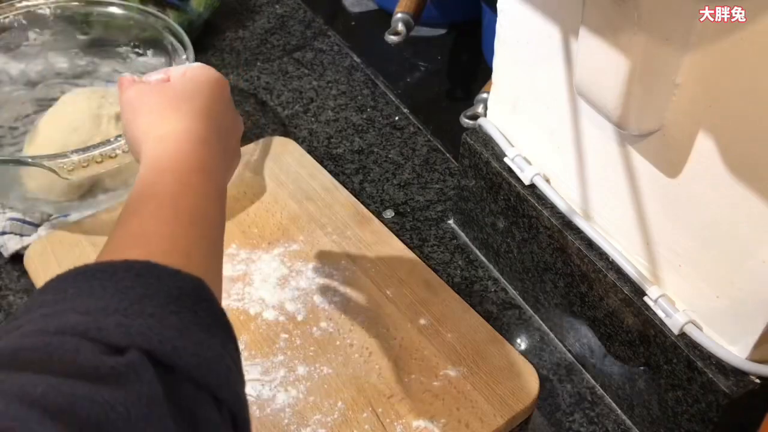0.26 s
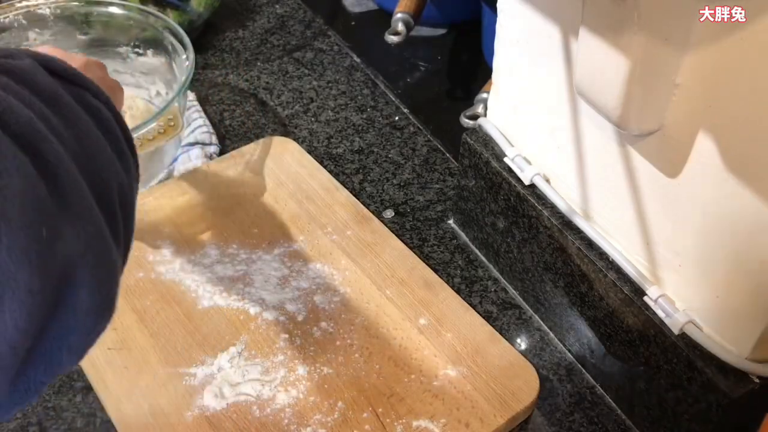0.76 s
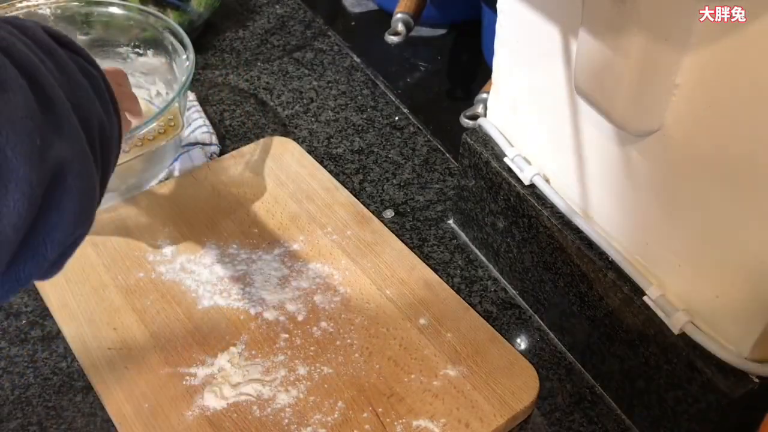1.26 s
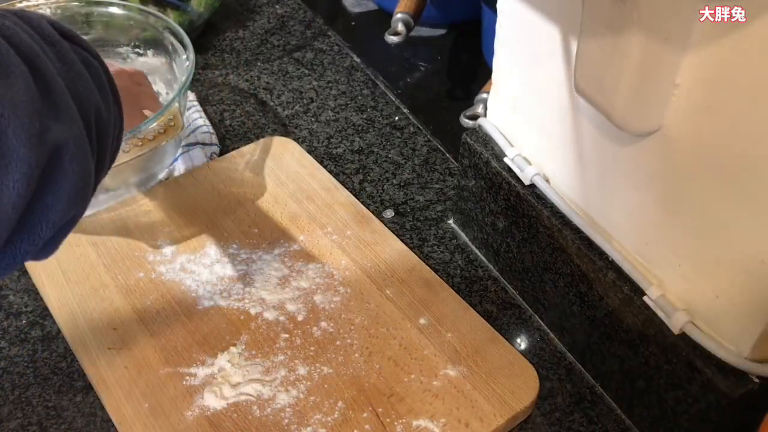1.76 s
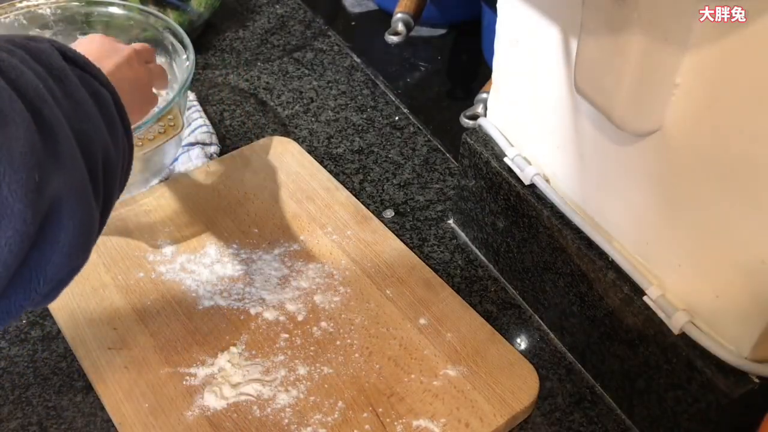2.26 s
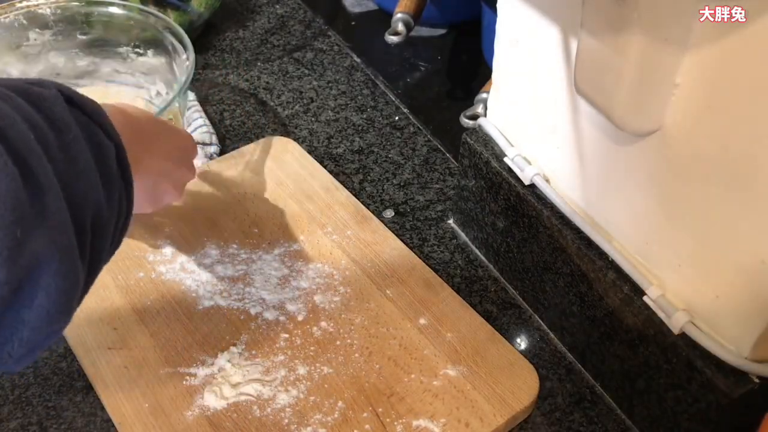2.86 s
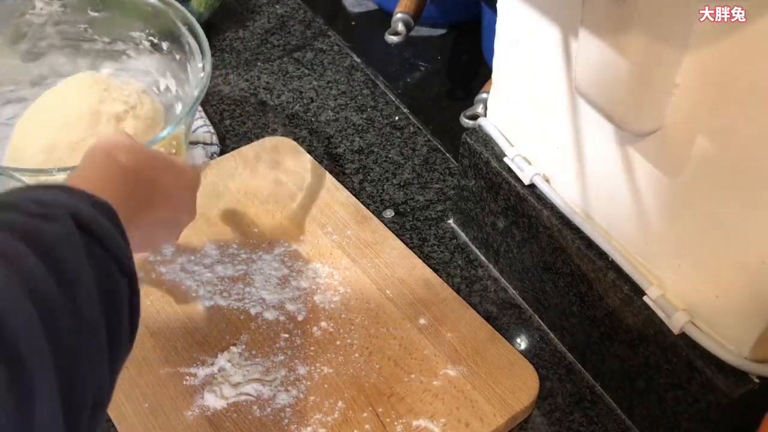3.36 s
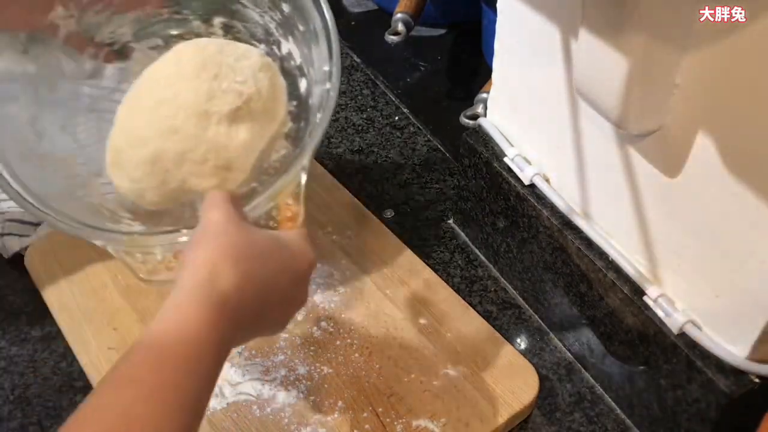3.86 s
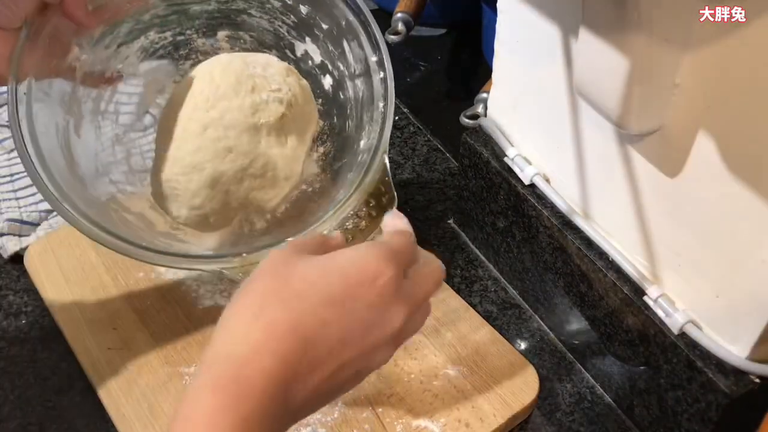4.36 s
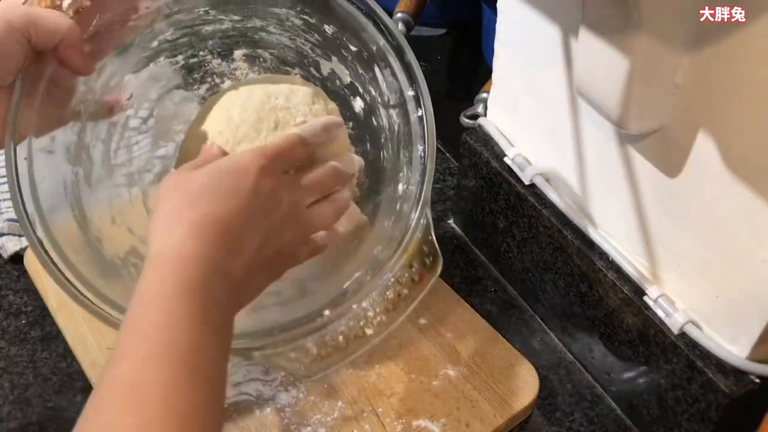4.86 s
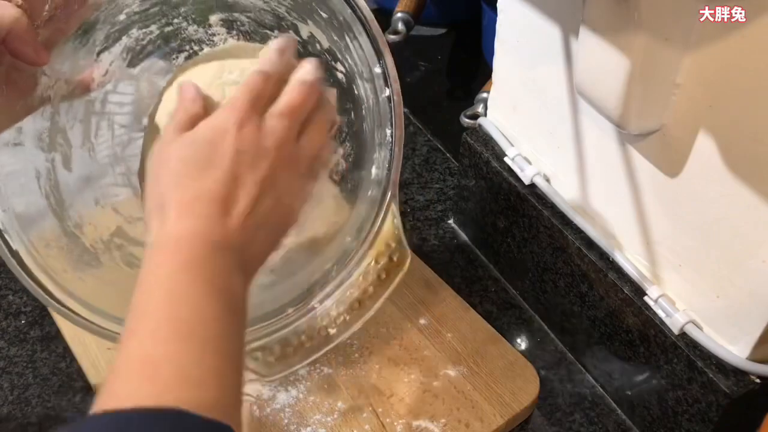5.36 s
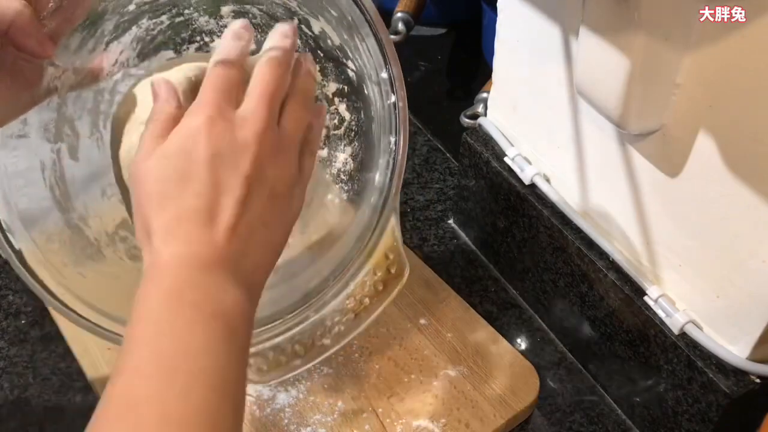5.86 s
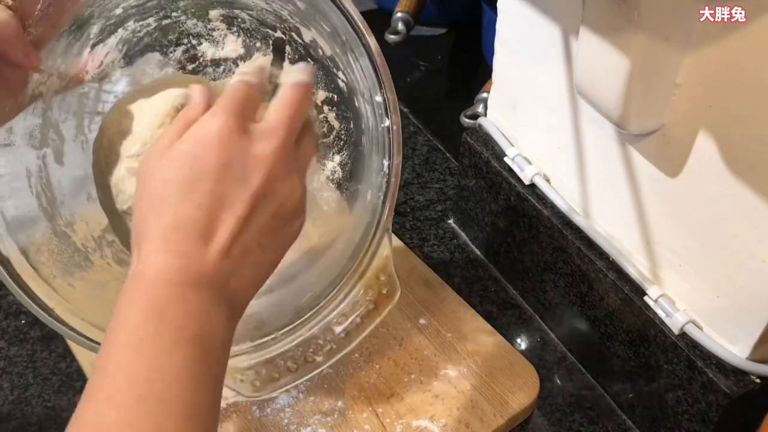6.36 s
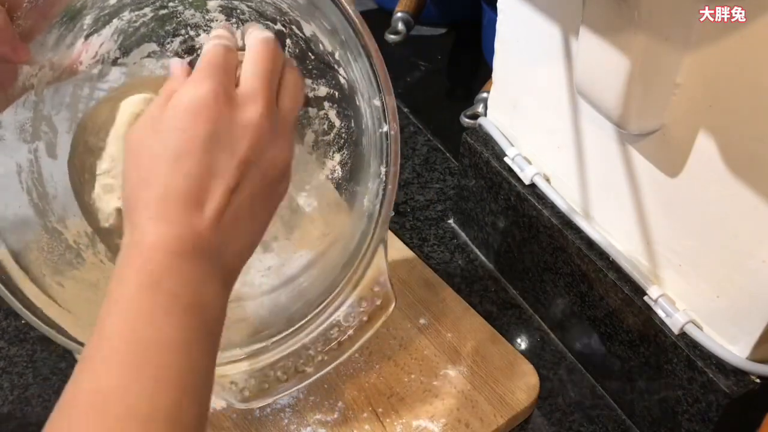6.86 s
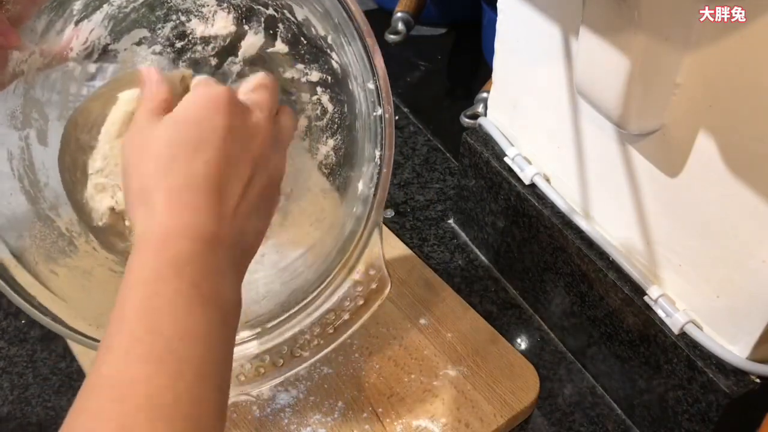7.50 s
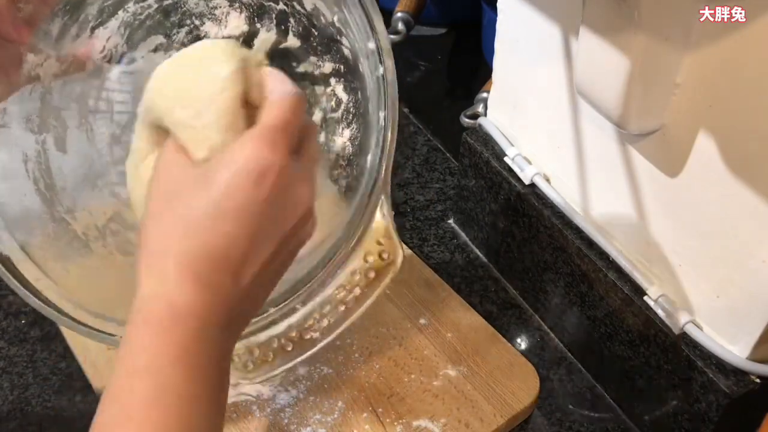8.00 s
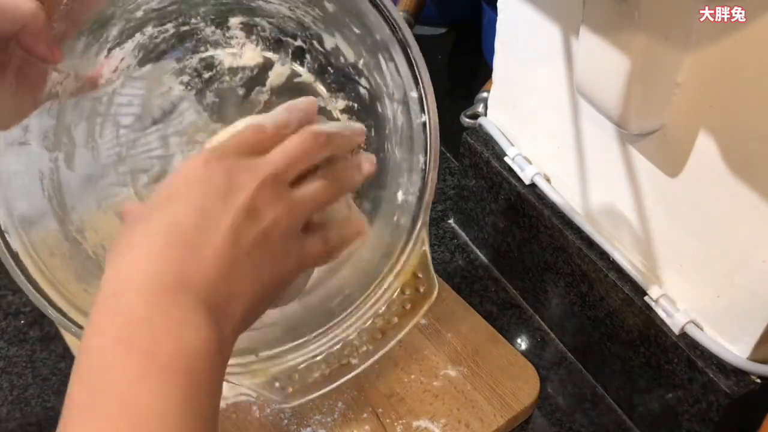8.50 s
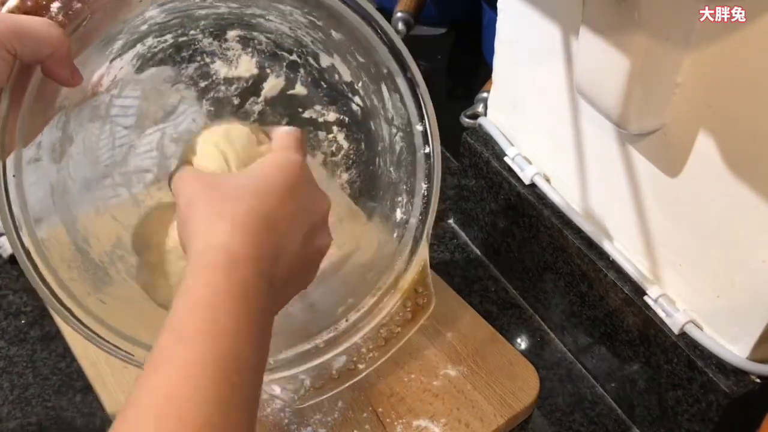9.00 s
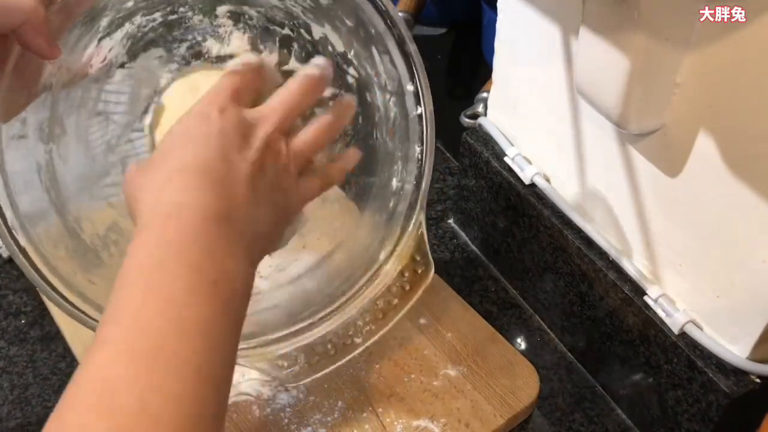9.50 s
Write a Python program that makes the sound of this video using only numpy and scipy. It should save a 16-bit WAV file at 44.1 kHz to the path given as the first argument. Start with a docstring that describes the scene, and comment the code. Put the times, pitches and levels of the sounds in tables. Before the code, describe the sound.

In a quiet kitchen, a sleeve brushes close to the microphone with a soft, thin hiss. A glass bowl lands on a stone counter with a loud ringing clank, followed by a duller knock. It scuffs over a wooden board while the sleeve rustles and ticks. Then a hand kneads dough in the bowl, with gentle rubbing, sticky crackles, small hollow plops and a few faint squeaks.

```python
"""A quiet kitchen: a glass bowl of dough clanks down twice on a stone counter and rings.
The bowl scuffs over a wooden board and a hand kneads in it: skin rubs, dough smears and squeaks
on the glass, air pockets plop. A sleeve brushes close to the microphone, hissing and ticking
in the resonances of its port."""
import sys
import numpy as np
from scipy import signal
from scipy.fft import rfft, irfft, next_fast_len
from scipy.io import wavfile
from scipy.ndimage import map_coordinates

SR = 44100
rng = np.random.default_rng(int(sys.argv[2]) if len(sys.argv) > 2 else 0)


def materialize(psi):
    """Save the field psi as 16-bit PCM at rate SR to the path in sys.argv[1].

    A 1-D psi becomes a single channel; in a 2-D psi each row is a channel.
    """
    bounded = np.clip(np.atleast_2d(psi).T, -1, 1)
    quanta = np.round(bounded * 32767).astype(np.int16)
    wavfile.write(sys.argv[1], SR, quanta)


N = 429534
TOP_HZ = 15900
HAND_IN_S = 5.2  # hand stays on the dough from here
# air cavity of the bowl: (frequency [Hz], density [dB])
BOWL_CAVITY = [(200, -11), (330, -7.5), (470, -9), (600, 4), (760, -13.5), (1200, -17), (3000, -40)]


def amp(db):
    return 10 ** (np.asarray(db) / 20)


def unit_rms(x):
    return x / np.sqrt(np.mean(x ** 2) + 1e-20)


def log_interp(points, hz):
    """Interpolate (frequency [Hz], value) points on a log axis."""
    point_hz, values = np.transpose(points)
    return np.interp(np.log(hz + 1), np.log(point_hz + 1), values)


def wobble(rate_hz):
    """Smooth random curve, rate_hz knots a second."""
    knots = rng.standard_normal(int(N * rate_hz / SR) + 4)
    return map_coordinates(knots, [np.arange(N) * rate_hz / SR])


def filtered(x, response):
    """FFT filter with gain response(hz)."""
    size = next_fast_len(len(x) + SR // 4)
    return irfft(rfft(x, size) * response(np.fft.rfftfreq(size, 1 / SR)), size)[:len(x)]


def coloured(x, spectrum):
    """Shape x by (frequency [Hz], density [dB]) points, rolled off past the ends; rms 1."""
    closed = [(spectrum[0][0] / 2, -80), *spectrum, (spectrum[-1][0] * 2, -80)]
    return unit_rms(filtered(x, lambda hz: amp(log_interp(closed, hz))))


def noise(spectrum, size=N):
    return coloured(rng.standard_normal(size), spectrum)


def add(track, start_s, sound):
    part = track[round(start_s * SR):][:len(sound)]
    part += sound[:len(part)]


def friction(rate_hz, scatter_db, share):
    """Countless fine slips plus sparse catches that carry `share` of the power."""
    catches = (rng.random(N) < rate_hz / SR) * rng.standard_normal(N)
    catches *= amp(scatter_db * np.clip(rng.standard_normal(N), -2, 2))
    return np.sqrt(share) * unit_rms(catches) + np.sqrt(1 - share) * rng.standard_normal(N)


def swells(moves, shape, lean, stray_db=-18, stray_spread=3.3):
    """Friction envelope following each movement's speed; lean > 0 fades faster than it grows."""
    t, power = np.arange(0, N, 32) / SR, 0
    for mid_s, length_s, db in moves:
        away = np.abs(2 * (t - mid_s) / length_s) * np.exp(lean * np.sign(t - mid_s))
        light_contact = amp(stray_db) ** 2 * np.exp(-(away / stray_spread) ** 2)
        power += amp(db) ** 2 * (np.exp(-away ** shape) + light_contact)
    return np.interp(np.arange(N) / SR, t, np.sqrt(power))


def ring(modes, t, scatter_db, waver=0):
    """Damped modes struck with random strength and phase; reflections make them waver."""
    knots_s, out = np.arange(0, 1, 1 / 60), 0
    drift = lambda: waver * np.interp(t, knots_s, rng.standard_normal(len(knots_s)))
    for hz, db, t60_s in modes:
        envelope = amp(db + rng.normal(0, scatter_db) + 5.9 * drift() - 60 * t / t60_s)
        out += envelope * np.sin(2 * np.pi * (hz * t + rng.random()) + drift())
    return out


def kitchen_decay(x):
    """Fade each frequency at the kitchen's reverberation rate."""
    # reverberation: (frequency [Hz], t60 [s])
    reverb = [(170, 0.36), (1000, 0.4), (3000, 0.33), (10000, 0.27)]
    hz, t, spectra = signal.stft(x, SR, nperseg=256)
    decay = amp(-60 * t / log_interp(reverb, hz)[:, None])
    return signal.istft(spectra * decay, SR, nperseg=256)[1][:len(x)]


def room(air_db=-55.5, whine_hz=10815, whine_db=-74):
    """Steady kitchen air with a thin electrical whine."""
    # room tone: (frequency [Hz], density [dB])
    air = [(20, 6.5), (40, -1.5), (80, -4.5), (160, -7.5), (320, -9.5), (640, -12.5), (1250, -15.5),
           (2500, -18), (4000, -19), (4900, -22.5), (6500, -19), (9000, -21), (12500, -21.5), (15800, -23)]
    whine = np.sin(2 * np.pi * np.cumsum(whine_hz + 8 * wobble(40)) / SR)
    return amp(air_db) * noise(air) + amp(whine_db) * whine


def sleeve(rest_db=-63.5, body_front_db=-14, body_beside_db=-19, turn_mid_s=3.83, turn_length_s=0.68):
    """Fibres slip over each other; the port's upper resonance sinks as the arm draws back."""
    # arm reaches out, draws the bowl in: (centre [s], length [s], level [dB])
    brushes = [(0.13, .08, -51.5), (0.25, 0.27, -59), (0.445, 0.12, -48.5), (0.545, 0.095, -44.5),
               (0.785, 0.077, -43.5), (0.965, .11, -47.5), (1.14, 0.15, -51.5), (1.315, 0.073, -52),
               (1.525, .04, -54), (2.89, .06, -37.5), (3.02, 0.056, -53), (3.17, 0.13, -53.5),
               (3.52, 0.2, -44), (3.68, 0.064, -45), (3.92, 0.25, -41), (4.125, 0.07, -42.5),
               (4.52, 0.052, -47), (4.65, 0.19, -38.5), (4.925, 0.045, -39), (5.04, 0.066, -49.5),
               (5.17, .14, -59.5)]
    # hiss in front of the port, hiss beside it, cloth body: (frequency [Hz], density [dB])
    hiss_front = [(3000, -15), (3900, -11.5), (4400, -4.5), (4800, 3.5), (5250, -2.5), (6300, -9.5),
                  (7400, -5.5), (8400, -3.5), (9400, 0), (11500, -5.5), (15500, -9.5)]
    hiss_beside = [(3000, -25), (3900, -15.5), (4400, -7.5), (4900, 4.5), (5250, 0), (6300, -9.5),
                   (7400, -2), (8400, 1), (9400, -5.5), (11500, -6.5), (15500, -10.5)]
    cloth_body = [(100, 4), (300, 1.5), (700, 1.5), (1500, 0.5), (2800, -2.5), (4500, -31)]
    t = np.arange(N) / SR
    resting = amp(rest_db + 2 * wobble(10)) * (t < HAND_IN_S)
    envelope = np.hypot(resting, swells(brushes, shape=1.78, lean=0.08))
    slips = friction(rate_hz=2200, scatter_db=3, share=0.3) * amp(1.37 * wobble(70))
    back = np.clip((t - turn_mid_s) / turn_length_s + 0.5, 0, 1)
    hiss = (1 - back) * coloured(slips, hiss_front) + back * coloured(slips, hiss_beside)
    body = amp((1 - back) * body_front_db + back * body_beside_db) * coloured(slips, cloth_body)
    return envelope * (hiss + body)


def ticks(low_hz=5100, high_hz=8500, low_db=9, high_db=-6, snap_db=-11, t60_s=0.0056, delay_s=0.0012):
    """Tiny snaps of cloth and sticky dough ring the microphone port."""
    # snaps: (time [s], level [dB], low resonance offset [dB])
    snaps = [(0.5245, -21, -24), (0.9716, -30, -19), (1.3457, -24, -25), (1.5365, -25.5, -21),
             (4.0301, -18.5, -26), (4.049, -24.5, -7.5), (4.8373, -30, -9), (4.9394, -9.5, -12),
             (5.0644, -34, -20), (5.6056, -40, -9), (5.6968, -35, -8), (7.2015, -40, -13),
             (7.3248, -40, -17), (7.878, -35, -27), (8.6915, -32, -15), (8.7044, -39, -14),
             (9.4464, -38, -14), (9.6114, -41, -21)]
    out, t = np.zeros(N), np.arange(SR // 40) / SR
    for time_s, db, offset_db in snaps:
        port = amp(low_db + offset_db) * np.sin(2 * np.pi * low_hz * t)
        port += amp(high_db) * np.sin(2 * np.pi * high_hz * t)
        snap = amp(snap_db) * noise([(4000, -9), (5000, 3), (8500, -3), (15000, 3)], size=len(t))
        add(out, time_s + delay_s, amp(db - 60 * t / t60_s) * (port + snap))
    # sources this small carry no bass
    return signal.lfilter(*signal.butter(N=7, Wn=4300, btype="high", fs=SR), out)


def drag(gain_db=-1):
    """The heavy bowl shifts on towel and board with an uneven low scuffing."""
    # shifts: (centre [s], length [s], level [dB])
    shifts = [(0.52, 0.27, -60), (0.79, .1, -59), (2.84, 0.078, -55), (3.49, .12, -60), (3.87, 0.37, -56),
              (4.62, 0.22, -59), (4.92, 0.096, -54.5), (5.06, 0.13, -62.5), (6.95, 0.14, -57.5),
              (7.09, .08, -60), (9.48, 0.32, -62)]
    unevenness = amp(gain_db + 3 * wobble(26))
    scuffing = noise([(70, -5), (190, -1), (330, -1.5), (520, -7), (1200, -11), (2400, -14)])
    return swells(shifts, shape=1.8, lean=0.05) * unevenness * scuffing


def squeaks(overtone_ratio=1.76, overtone_db=-8, width=0.17):
    """Stick-slip of damp dough on glass: a rough, narrow tone that swells and fades."""
    # slips: (centre [s], level [dB], pitch [Hz], length [s])
    slips = [(7.709, -54.5, 1960, 0.016), (8.902, -61, 2060, 0.07), (8.968, -64, 3580, .04),
             (8.997, -58.5, 1950, 0.041), (9.362, -65, 1930, .015)]
    out, t = np.zeros(N), np.arange(SR // 4) / SR
    band = lambda hz: noise([(hz / (1 + width), -26), (hz, 0), (hz * (1 + width), -26)], size=len(t))
    for mid_s, db, hz, length_s in slips:
        tone = band(hz) + amp(overtone_db) * band(hz * overtone_ratio)
        envelope = np.exp(-2 * ((t - t.mean()) / length_s) ** 2)
        add(out, mid_s - t.mean(), amp(db) * tone * envelope)
    return out


def plops(t60_s=0.021, attack_s=0.00034, gain_db=2, cavity_db=-21, cavity_t60_s=0.18, push_s=0.013):
    """An air pocket rings for a few cycles, the palm pushes, the bowl's cavity answers."""
    # air pockets and pats: (time [s], level [dB], pitch [Hz], relative push [dB])
    pockets = [(2.827, -37, 760, -16), (3.04, -47, 765, -20), (3.979, -38.5, 258, -4),
               (4.031, -41, 220, -8), (4.051, -34, 160, -9), (4.642, -45.5, 200, 1),
               (5.2915, -37, 586, -17), (5.298, -31.5, 616, -18), (5.671, -46, 640, -14),
               (5.876, -46.5, 302, 2.5), (6.904, -30.5, 370, -10), (7.08, -47, 340, -14),
               (7.636, -47, 560, -15), (7.7065, -35.5, 494, -15), (8.223, -40.5, 566, -16),
               (8.309, -47, 617, -17), (8.6057, -33, 607, -12), (9.325, -46, 715, -23),
               (9.348, -39.5, 590, -19), (9.357, -45, 650, -12), (9.3845, -34, 634, -13)]
    out, t = np.zeros(N), np.arange(SR // 3) / SR
    for time_s, db, hz, push_db in pockets:
        pocket = ring([(hz, 0, t60_s), (hz * 1.83, -13, t60_s * 0.72)], t, scatter_db=0.6)
        push = amp(push_db) * (1 - t / push_s) * np.exp(-t / push_s)
        cavity = amp(cavity_db - 60 * t / cavity_t60_s) * noise(BOWL_CAVITY, size=len(t))
        add(out, time_s, amp(db + gain_db) * (pocket + push + cavity) * (1 - np.exp(-t / attack_s)))
    return out


def kneading(skin_db=-1.7, smear_db=-2.5, cavity_db=-3, rest_db=-64, shape=1.77, lean=0.1):
    """Skin rubs on floury dough; the dough smears and peels along the glass with a sticky crackle."""
    # hand strokes: (centre [s], length [s], rub level [dB], smear level [dB])
    strokes = [(5.323, .05, -55, -68), (5.5, 0.17, -54.5, -66), (5.7, 0.033, -50, -53.5),
               (5.945, 0.057, -50, -58), (6.146, 0.064, -50.5, -56), (6.58, .2, -59, -69.5),
               (6.978, 0.14, -56, -66), (7.103, .05, -55, -63), (7.322, .04, -51.5, -56),
               (7.71, .05, -59, -59), (7.842, .09, -57.5, -70), (8.155, 0.028, -56, -68),
               (8.215, 0.036, -54.5, -65), (8.31, .02, -53, -60), (8.49, .06, -58.5, -70),
               (8.612, 0.063, -51, -59), (8.779, 0.059, -48.5, -55), (8.905, .06, -56.5, -56.5),
               (8.978, .05, -54, -59), (9.073, 0.041, -51.5, -60), (9.155, .04, -55, -63),
               (9.356, .035, -56, -66), (9.472, .08, -53.5, -63), (9.6, 0.076, -47, -60),
               (9.735, .04, -52, -69)]
    # palm works the dough against the bottom: (centre [s], length [s], level [dB])
    presses = [(5.31, 0.054, -51), (5.68, .04, -57), (6.92, .04, -54), (7.645, .04, -58), (7.74, .07, -57),
               (8.23, .05, -59), (8.62, .05, -55), (8.91, 0.095, -55), (9.375, 0.065, -51)]
    # skin on dough, dough on glass: (frequency [Hz], density [dB])
    skin_band = [(3000, -13), (4200, -5), (4800, 3.5), (6200, -7), (8500, -0.5), (11500, -2), (15500, -8)]
    smear_band = [(800, 2.5), (1400, -3.5), (2050, -0.5), (2700, -2), (3500, -7), (5000, -5)]
    resting = amp(rest_db + 3.3 * wobble(8)) * (np.arange(N) / SR > HAND_IN_S)
    rub = np.hypot(resting, swells([(s, length_s, db) for s, length_s, db, _ in strokes], shape, lean))
    smear = swells([(s, length_s, db) for s, length_s, _, db in strokes], shape, lean)
    press = np.hypot(resting / 2, swells(presses, shape=1.6, lean=-0.18))
    skin = coloured(friction(rate_hz=320, scatter_db=4.5, share=0.31), skin_band)
    crackle = coloured(friction(rate_hz=300, scatter_db=5.5, share=0.41), smear_band)
    cavity = coloured(friction(rate_hz=120, scatter_db=4, share=0.22), BOWL_CAVITY)
    return amp(skin_db) * rub * skin + amp(smear_db) * smear * crackle + amp(cavity_db) * press * cavity


def clanks(crack_t60_s=0.031, attack_s=0.00018, grit_db=-18, grit_t60_s=0.28):
    """The bowl lands hard and rattles, then drops back on its base with a duller knock."""
    # contacts: (time [s], glass [dB], seated bowl [dB], clatter [dB], crack [dB], cutoff [Hz])
    contacts = [(2.2982, -15.5, -30.5, -19.5, -8, 15100), (2.3279, -34, -38.5, -29.5, -19, 9000),
                (2.3552, -29, -43.5, -29, -20, 8000), (2.5907, -30, -24, -28.5, -32, 2110),
                (2.6135, -46, -30.5, -29.5, -36, 1600)]
    # bowl modes: (frequency [Hz], level [dB], t60 [s])
    glass_modes = [(708, -5, 0.26), (741, 0, 0.2), (776, -1, 0.31), (1017, -13, 0.42), (1112, -10, 0.38),
                   (1151, -6, 0.3), (1654, -8, 0.38), (1799, -10, 0.3), (1862, -12, 0.3), (2109, -13, 0.3),
                   (2137, -7, 0.38), (2173, -8, 0.33), (2744, -5, 0.2), (2847, -7, 0.28), (2884, -4, 0.24),
                   (2918, -3.5, 0.29), (2975, -3.5, 0.28), (4521, -8, 0.29), (4535, -10, 0.23),
                   (5527, -21, 0.43), (5998, -26, 0.35), (6697, -22, 0.25), (6944, -19, 0.22),
                   (7579, -18.5, 0.34), (9502, -17, 0.29), (10672, -31, 0.3), (12440, -26, 0.27),
                   (12723, -35, 0.23), (14627, -37, 0.23), (15640, -26, 0.24)]  # wall
    seated_bowl_modes = [(170, -6, 0.3), (234, -11, 0.2), (349, -15, 0.26), (408, -17, 0.3), (614, -9, 0.2),
                         (680, 0, 0.24), (820, -9, 0.3), (1029, -10, 0.3), (1146, -6, 0.28),
                         (1201, -7, 0.3), (1294, -9, 0.22), (1652, -8, 0.3)]  # duller, lower ring as it rests on the counter
    # noise spectra: (frequency [Hz], density [dB])
    clatter = [(60, -19), (110, -18), (165, -4.5), (300, -5.5), (500, -3.5), (740, 0.5), (1100, 2),
               (1400, -0.5), (2200, -3.5), (2950, -9.5), (3500, -17), (7000, -20.5), (15000, -34)]  # dense ring of bowl, counter and kitchen
    crack = [(130, -15.5), (400, -5.5), (750, 2.5), (1300, -15), (2200, 3), (2950, 10), (3700, -27),
             (8000, -26), (15000, -29)]  # impact
    grit = [(3000, 2.5), (4800, -0.5), (7500, 0.5), (10000, -5.5), (15000, -11.5)]  # flour crushed under the base
    out, t = np.zeros(N), np.arange(SR * 3 // 4) / SR
    for time_s, glass_db, seated_db, clatter_db, crack_db, cutoff_hz in contacts:
        blow = amp(glass_db) * ring(glass_modes, t, scatter_db=0.5, waver=0.37)
        blow += amp(seated_db) * ring(seated_bowl_modes, t, scatter_db=0, waver=0.33)
        blow += amp(clatter_db) * kitchen_decay(noise(clatter, size=len(t)))
        blow += amp(crack_db - 60 * t / crack_t60_s) * noise(crack, size=len(t))
        # a softer contact lasts longer: less treble
        blow = signal.lfilter(*signal.butter(2, cutoff_hz, fs=SR), blow)
        blow += amp(seated_db + grit_db - 60 * t / grit_t60_s) * noise(grit, size=len(t))
        add(out, time_s, blow * (1 - np.exp(-t / attack_s)))
    return out


def scene():
    return (clanks() + sleeve() + drag() + kneading() + squeaks() + ticks() + plops() + room())[None]


def record(dry):
    """Brick-wall low-pass at TOP_HZ."""
    return filtered(dry[0], lambda hz: hz < TOP_HZ)[None]


dry = scene()
out = record(dry)
materialize(out)
```